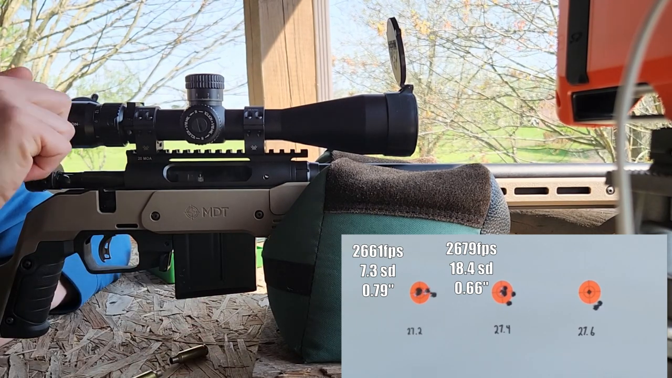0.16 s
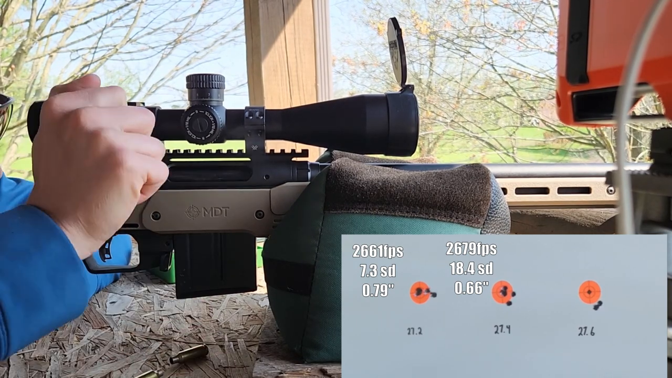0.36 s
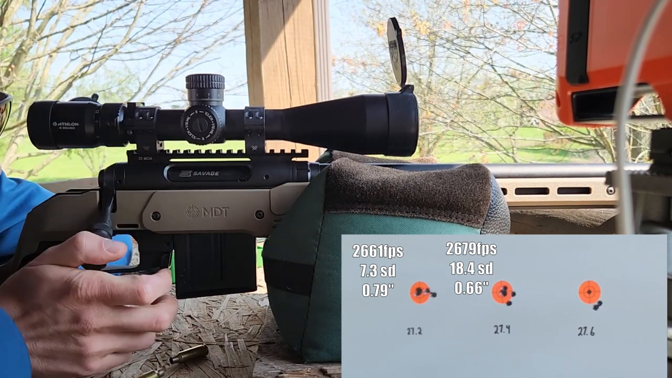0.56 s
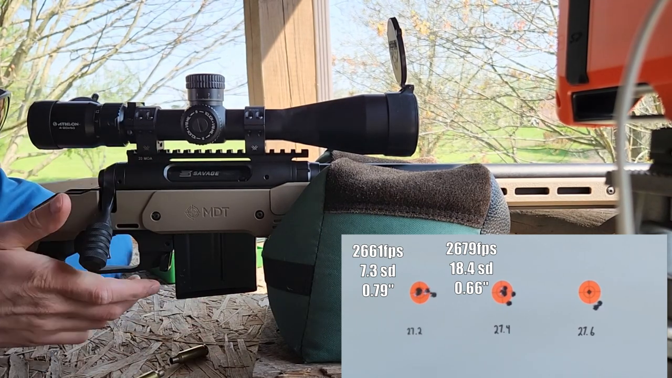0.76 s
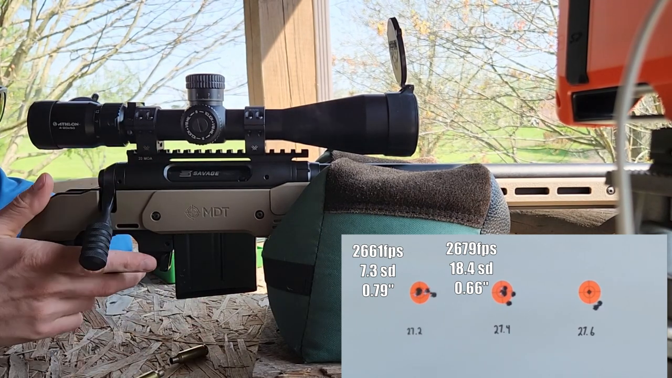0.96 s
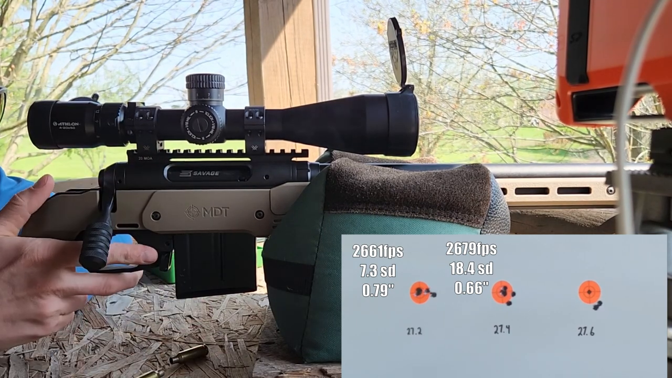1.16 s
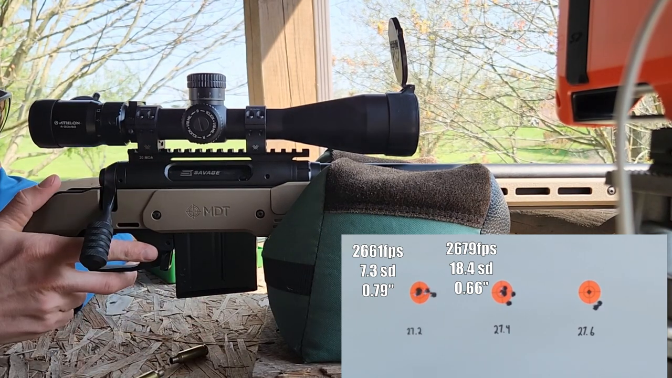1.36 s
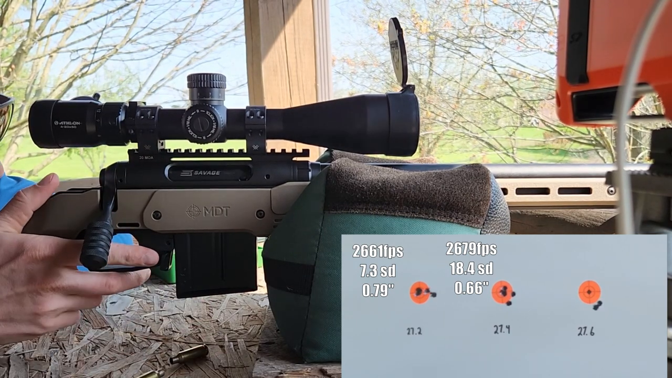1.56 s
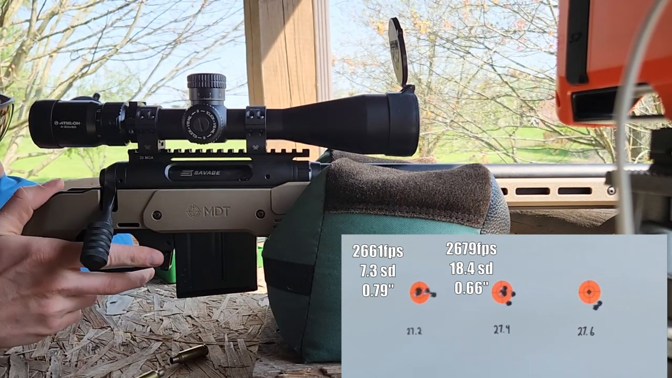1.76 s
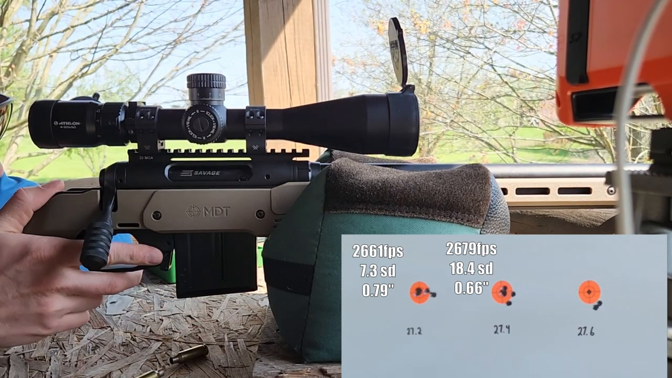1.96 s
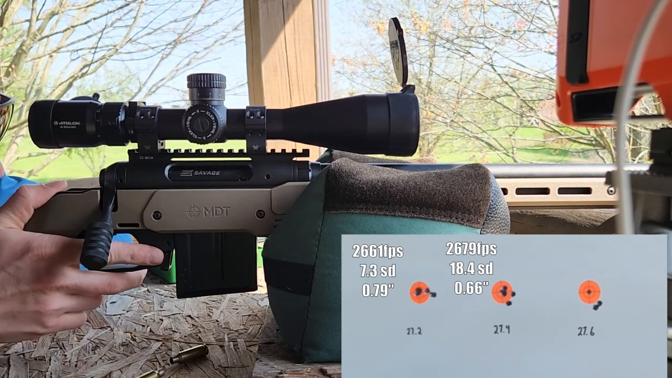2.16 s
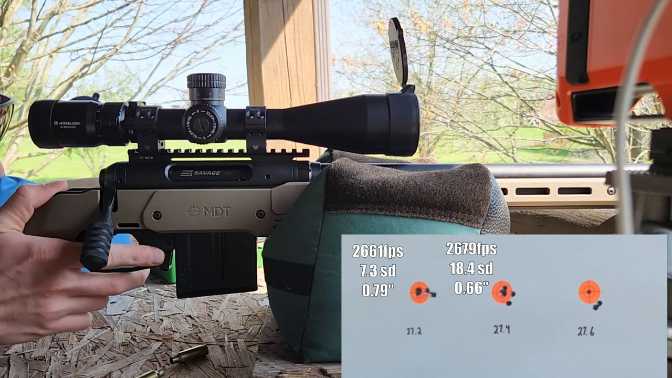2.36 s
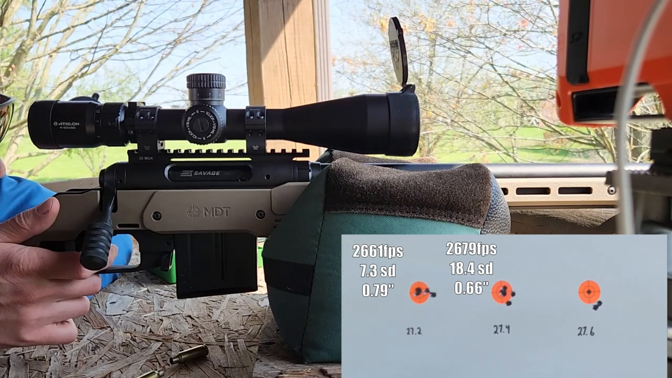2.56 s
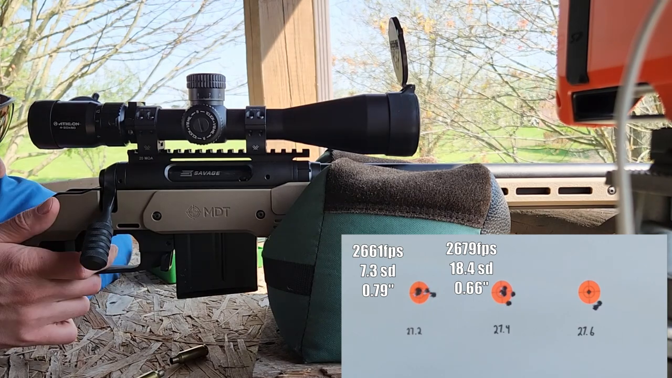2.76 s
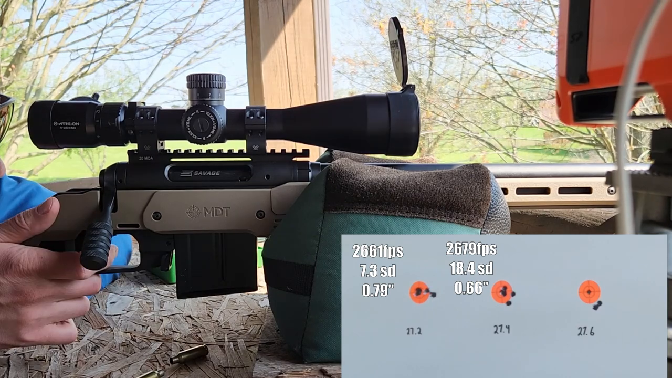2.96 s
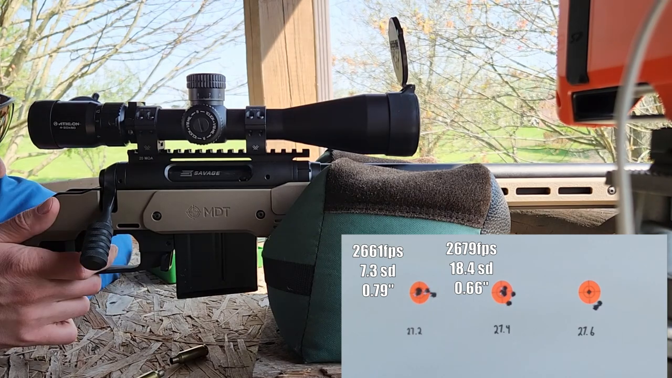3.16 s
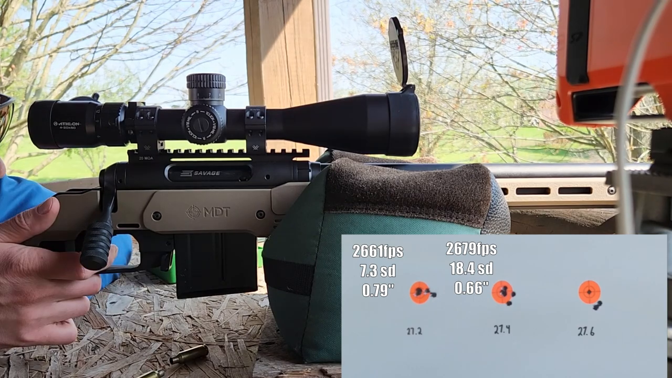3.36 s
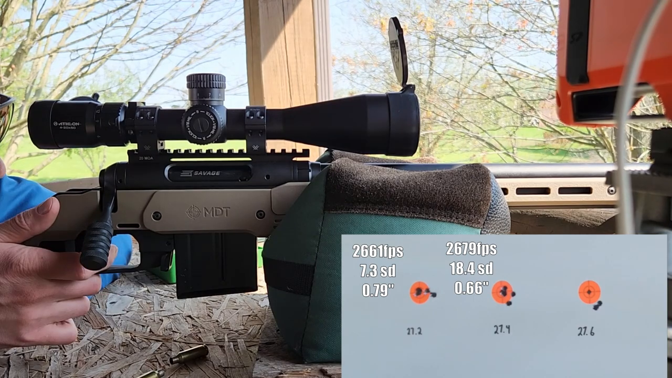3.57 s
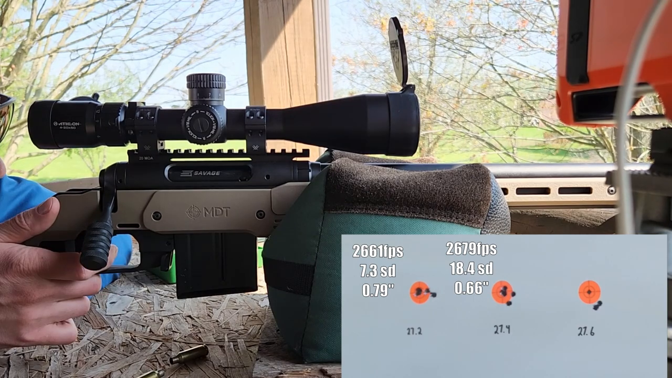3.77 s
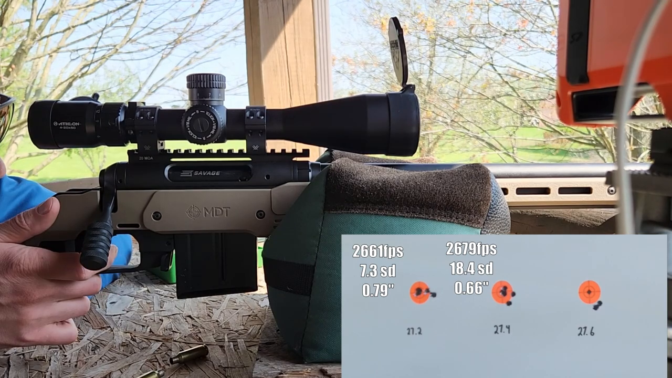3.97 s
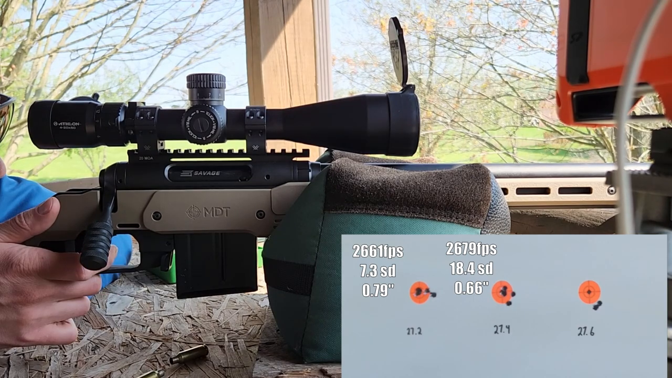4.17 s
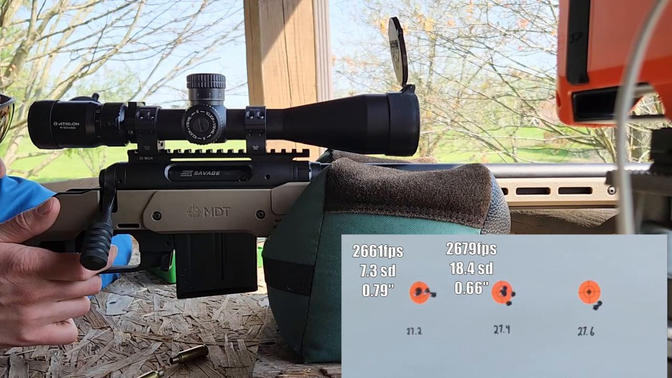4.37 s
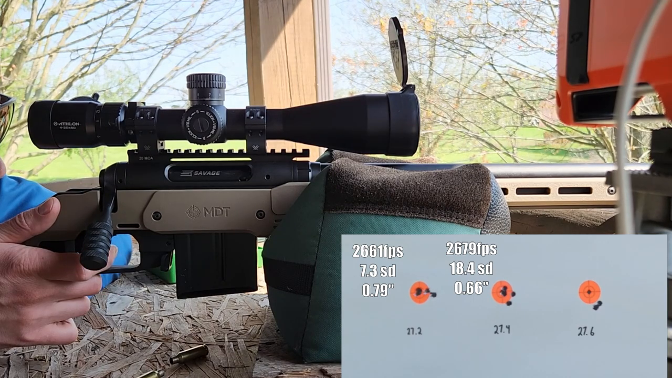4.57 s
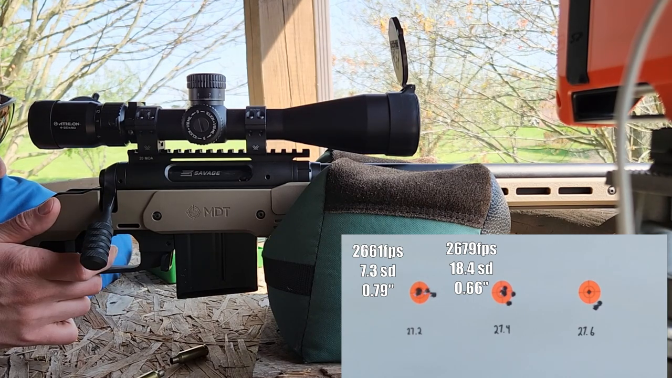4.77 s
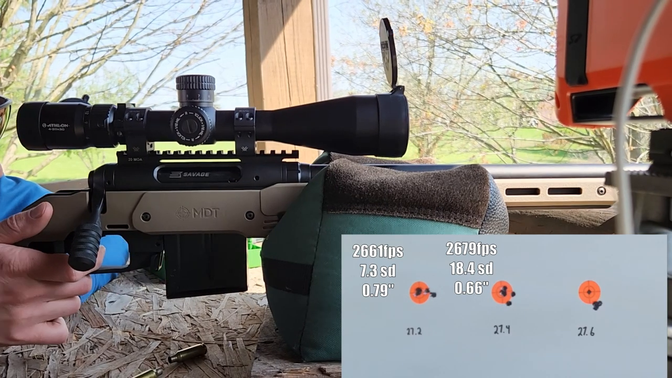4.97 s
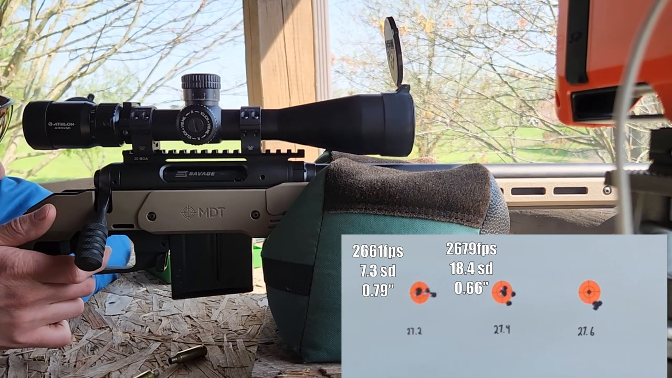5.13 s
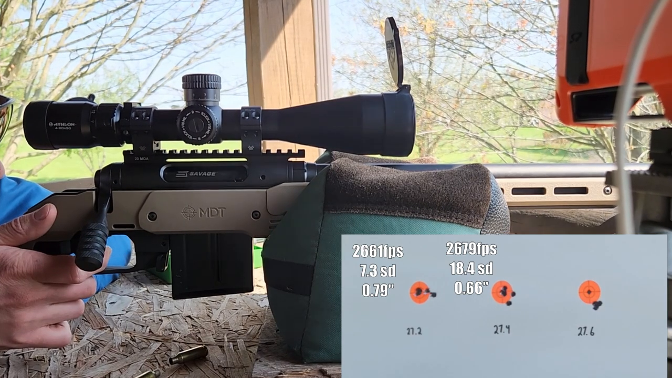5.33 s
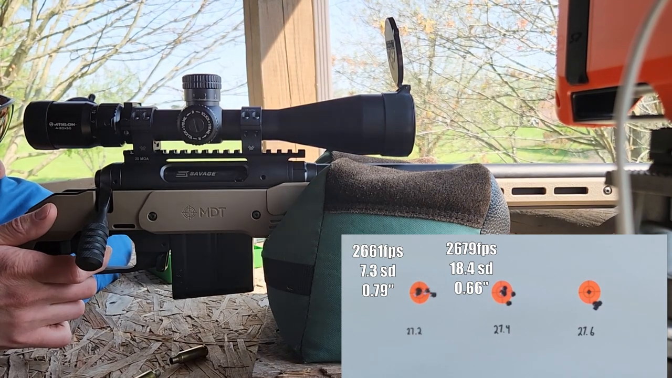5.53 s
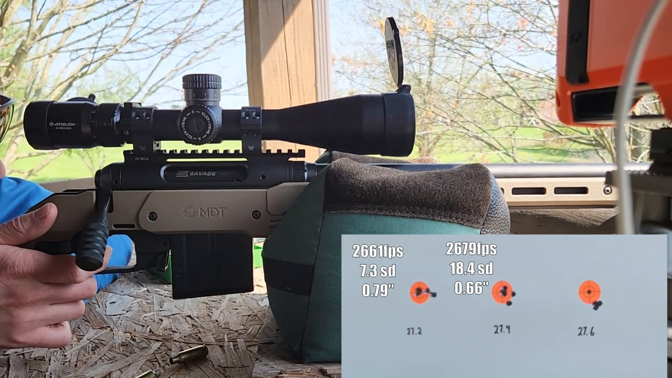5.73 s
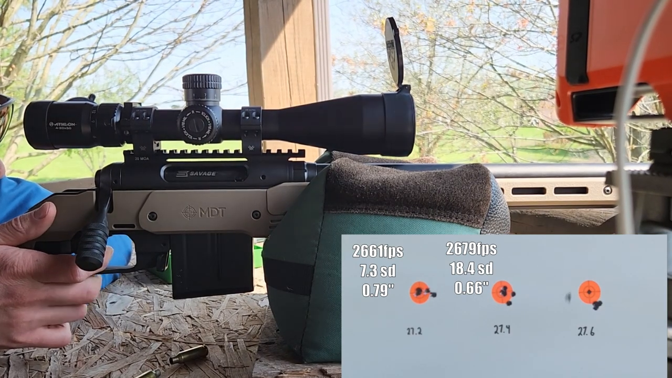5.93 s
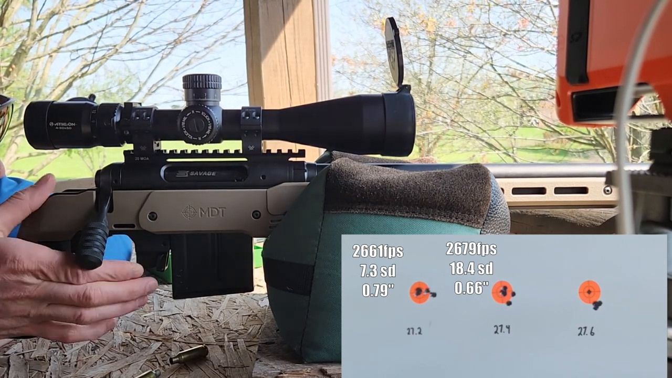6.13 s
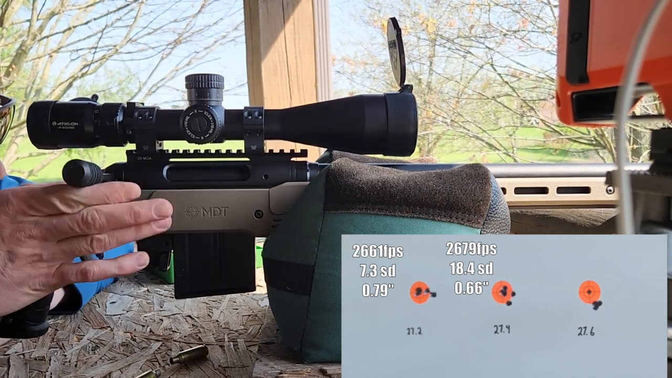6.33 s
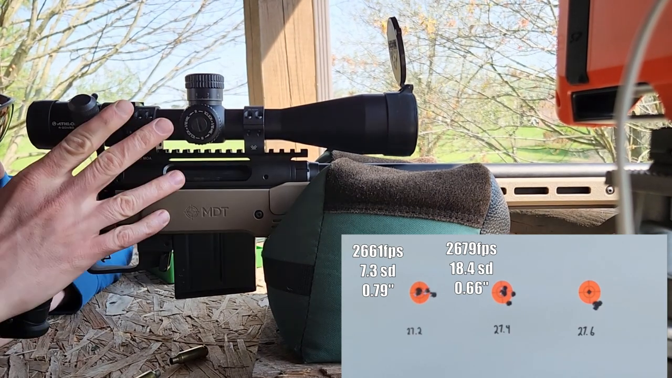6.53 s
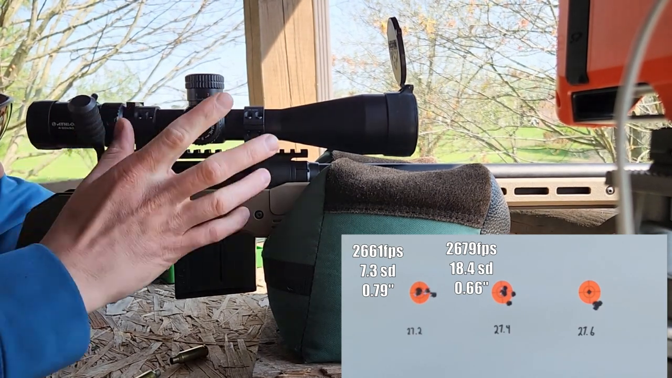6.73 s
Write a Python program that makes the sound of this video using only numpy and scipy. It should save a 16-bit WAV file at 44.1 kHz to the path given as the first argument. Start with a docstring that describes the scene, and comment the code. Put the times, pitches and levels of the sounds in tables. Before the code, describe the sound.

Very close to the microphone, a rifle bolt is pushed forward and locked with hard, bright steel clacks and a gritty slide. A quiet wait follows, with faint distant bird chirps, low rumble and slight hiss. Near five seconds one deafening shot bursts out, flattening the microphone, with quick hard echoes and a roll fading into the woods. The bolt then clicks open more softly.

```python
"""Bolt-action rifle at a range

A bolt-action rifle on a bench under a wooden shelter in the country. The bolt runs forward and locks: impact
noise excites the modes of the action. After a quiet wait with far birds (gliding sines) and low rumble
(coloured noise), one overloading shot, enveloped noise with a slow pressure swing, rolls away as echoes and
scattering among the trees. Then the bolt is lifted and starts back."""
import sys
import numpy as np
from scipy import signal
from scipy.fft import rfft, irfft, next_fast_len
from scipy.io import wavfile

SR = 44100
rng = np.random.default_rng(int(sys.argv[2]) if len(sys.argv) > 2 else 0)


def transcribe(u):
    """Save the signal u as a 16-bit wav file named by the first command-line argument.

    u: samples, shape (n,) or (channels, n), limited to [-1, 1]; the rate is SR.
    q: integer samples, one column per channel.
    """
    v = np.clip(np.atleast_2d(u).T, -1, 1)
    q = np.round(v * 32767).astype(np.int16)
    wavfile.write(sys.argv[1], SR, q)


N = 304290
TIME = np.arange(N) / SR
CUTOFF_HZ = 16000
LEFT_RIGHT = np.array([[1], [-1]])   # opposite signs for the two channels
SHOT_S = 4.9682

# Spectrum of the bright crack: (frequency [Hz], level [dB])
CRACK_SPECTRUM = [(100, -11.5), (500, 0.5), (1500, -1), (4500, -3.5), (8000, -5.5), (11000, -9.5),
                  (15500, -3)]
# Spectrum of the roar between bench and roof: (frequency [Hz], level [dB])
ROAR_SPECTRUM = [(60, -15), (140, -5), (300, -3), (480, 2.5), (720, 1), (1100, -2), (2000, -6),
                 (4000, -10.5), (8000, -17.5), (15500, -32.5)]
# Pressure swing of the muzzle gas: (crest [s], period [s], half length [s], height before the stereo gain)
GAS_SWING = (4.9838, 0.02, .011, 0.39)
LEAD_IN_S, LEAD_IN_DB = 0.012, -31.5   # a faint bright hiss swells just before the shot
MUZZLE_DB, MUZZLE_T60_S = -11.5, 0.085   # first crack, straight from the muzzle
# bright reflections of the crack under the roof
CRACK_DB, CRACK_ATTACK_S, CRACK_HOLD_S, CRACK_T60_S = -11, 0.026, 0.042, 0.11
ROAR_DB, ROAR_ATTACK_S, ROAR_HOLD_S, ROAR_T60_S = -6, 0.024, 0.044, 0.25
ROAR_LUMPS_DB = 1.24   # reflections arrive in clumps


def shot():
    """Impulsive radiation: a faint hiss, a crack, the swing of the muzzle gas and a roar of crowded reflections."""
    lead_in = from_db(LEAD_IN_DB) * swell(SHOT_S - LEAD_IN_S, 0.0065, LEAD_IN_S, 0.03)
    muzzle = from_db(MUZZLE_DB) * swell(SHOT_S, 0.0005, 0.0014, MUZZLE_T60_S)
    reflected = from_db(CRACK_DB) * swell(SHOT_S, CRACK_ATTACK_S, CRACK_HOLD_S, CRACK_T60_S)
    crack = together([muzzle, reflected])
    roar = from_db(ROAR_DB) * swell(SHOT_S, ROAR_ATTACK_S, ROAR_HOLD_S, ROAR_T60_S)
    roar_sound = roar * noise(ROAR_SPECTRUM) * from_db(ROAR_LUMPS_DB * drift(250))

    crest_s, period, half_length, height = GAS_SWING
    t = TIME - crest_s
    window = np.exp(-((t - 0.004) / half_length) ** 4 / 2)
    swing = height * np.cos(2 * np.pi * t / period) * window
    ports = from_db(1.7 * LEFT_RIGHT)   # the swing presses harder on the left port
    return lead_in * noise(STEEL_SPECTRUM) + crack * noise(CRACK_SPECTRUM) + roar_sound + swing * ports


# Hard echoes from the range: (arrival [s], peak before rounding [dB], length before rounding [s])
HARD_ECHOES = [(5.119, -4, 0.00181), (5.1229, -6.5, 0.00226)]


def hard_echoes(dull_hz=1500, ring_hz=215, ring_width=170):
    """Specular reflection: hard surfaces send back the N-shaped shock, rounded by distance."""
    out = np.zeros((2, N))
    for s, peak_db, length in HARD_ECHOES:
        add(out, s, from_db(peak_db) * np.linspace(1, -1, int(length * SR)))
    rounded = signal.sosfilt(signal.butter(1, dull_hz, fs=SR, output="sos"), out + 1e-18)
    return rounded + 0.53 * resonate(rounded, ring_hz, ring_width)


# Spectrum of the dull echoes: (frequency [Hz], level [dB])
ECHO_SPECTRUM = [(40, -13.5), (110, -1.5), (200, -3), (400, 1), (650, -4), (1000, -15.5), (2000, -19.5),
                 (5000, -50.5)]
# Spectrum scattered by the branches, before loss in the air: (frequency [Hz], level [dB])
SCATTER_SPECTRUM = [(200, -7.5), (600, -2.5), (1300, -3), (2200, -1), (4000, -4), (7000, -8), (10000, -15),
                    (15000, -24.5)]


def rolling_report(air_db=9.0, lumps_db=0.58):
    """Atmospheric absorption: the longer the path of an echo, the more treble the air takes.

    air_db is the loss per second and per kHz above 1.8 kHz."""
    echo, scatter = echo_levels()
    branches = rfft(noise(SCATTER_SPECTRUM))
    absorbed = 0
    hz = np.fft.rfftfreq(N, 1 / SR)
    centres = np.geomspace(500, CUTOFF_HZ, 9)
    travel = np.clip(TIME - HARD_ECHOES[0][0], 0, 1.4)   # s since the first hard echo
    for centre, own in zip(centres, np.eye(len(centres))):
        band = irfft(branches * np.interp(hz, centres, own), N)
        absorbed = absorbed + band * from_db(-air_db * travel * max(centre / 1000 - 1.8, 0))
    return (echo * noise(ECHO_SPECTRUM) + scatter * absorbed) * from_db(lumps_db * drift(110))


# Banks and tree lines return the report: (arrival [s], dull echo [dB], scatter from the branches [dB])
RETURNING_ECHOES = [(5.112, -22, -37), (5.155, -28.5, -43), (5.316, -27.5, -35), (5.721, -43, -46),
                    (6.5, -49, -67.5)]
SMEAR_RISE, SMEAR_HOLD, SMEAR_T60 = 0.11, 0.14, 0.97   # attack, hold and decay, as shares of the delay
BRANCHES_LEAD, BRANCHES_T60 = 0.18, 2.7   # branches answer earlier and for longer: shares of the delay
# the wood as a whole
TAIL_ATTACK_S, TAIL_T60_S, TAIL_ECHO_DB, TAIL_SCATTER_DB = 0.12, 3.94, -41.5, -39.5


def echo_levels():
    """Diffuse decay: a dying tail plus single returns, each smeared in proportion to its delay."""
    tail = swell(SHOT_S, TAIL_ATTACK_S, 0, TAIL_T60_S)
    echo = [from_db(TAIL_ECHO_DB) * tail]
    scatter = [from_db(TAIL_SCATTER_DB) * tail]
    for s, echo_db, scatter_db in RETURNING_ECHOES:
        delay = s - SHOT_S
        rise, hold = SMEAR_RISE * delay, SMEAR_HOLD * delay
        start = s - rise
        early = start - BRANCHES_LEAD * delay
        echo.append(from_db(echo_db) * swell(start, rise, hold, SMEAR_T60 * delay))
        scatter.append(from_db(scatter_db) * swell(early, rise, hold, BRANCHES_T60 * delay))
    return together(echo), together(scatter)


# Blows of bolt and cartridge, in order: a round is picked up, jumps from the magazine and runs into the
# chamber; the lugs engage and the handle locks; a touch while aiming; the handle lifts, the case breaks
# free and the bolt starts back. Steel and thud levels are relative:
# (time [s], steel level [dB], chatter decay [s], brightness [dB per octave], clack [Hz], stock thud [dB])
BOLT_CONTACTS = [ (.187, -51, 0.021, 0, 1200, -75), (0.2225, -22, 0.0047, 3.5, 780, -46),
                 (.234, -24.5, 0.014, -1.5, 726, -66), (.259, -21.5, .009, -1, 740, -60),
                 (.269, -8, 0.0028, -2, 3600, -53), (0.2726, -4, .0026, -2.5, 780, -53),
                 (.277, -10.5, .0033, 5, 1447, -43), (.300, -24, .008, .5, 3300, -53.5),
                 (0.3267, -19, 0.0033, 6, 4450, -60), (.335, -11, 0.0028, 4.5, 10010, -40),
                 (.472, -39.5, 0.0065, -1, 6000, -61), (.4815, -25.5, 0.0062, 1, 2930, -47.5),
                 (.614, -22, 0.0011, -1.5, 3600, -49), (.616, -17.5, .0022, -.5, 2300, -32),
                 (1.893, -61, .012, -2.5, 3390, -85), (6.291, -42.5, 0.003, 2, 3800, -75),
                 (6.321, -31.5, 0.0049, -2, 1910, -49), (6.464, -37, 0.0087, 2, 12000, -60),
                 (6.481, -31, 0.0081, 0.5, 10500, -45.5), (6.4912, -24.5, 0.0066, 3, 2380, -42.5),
                 (6.501, -30.5, .0031, -2, 900, -49), (6.877, -47, 0.013, -3, 1810, -57)]
# Broad spectrum of a steel contact: (frequency [Hz], level [dB])
STEEL_SPECTRUM = [(150, -33), (440, -30), (600, -4), (760, -1), (1400, -2.5), (2400, -4.5), (4000, -2),
                  (5600, -7.5), (7500, -7.5), (9500, -12), (15500, -18)]
# Modes of the action: (frequency [Hz], width [Hz], relative level [dB])
ACTION_MODES = [(746, 110, 5.5), (1060, 75, 4.5), (1310, 29, 1.5), (1517, 60, 2), (1863, 200, 4.5),
                (2794, 28, -1.5), (3127, 35, 1), (3492, 90, 2), (3860, 80, 5.5), (4300, 80, 1.5),
                (4890, 100, 0), (6400, 340, 1.5), (7300, 120, 4.5), (12200, 210, 3.5)]
# Thin steel parts that ring on after a blow: (frequency [Hz], relative level [dB], t60 [s])
THIN_PART_MODES = [(3117, -0.5, 0.18), (4199, -4.5, 0.25), (5868, -1, 0.17), (5986, -4, 0.17),
                   (6460, -3.5, 0.17), (7074, -1, 0.14)]
# Dull knock of the stock: (frequency [Hz], level [dB])
STOCK_SPECTRUM = [(40, -18), (110, 0.5), (200, -4.5), (330, 0.5), (520, -9.5), (1200, -37.5)]
# Stereo likeness of the rifle's own parts: (frequency [Hz], left-right correlation [-1 to 1])
NEAR_LIKENESS = [(100, 1), (900, .8), (2000, .45), (4000, 0.05), (8000, 0.12), (15000, 0.055)]
STEEL_LOW_HZ = 560   # the small steel parts radiate little below this


def bolt(size=4096, clack_db=5.0, clack_octaves=0.58, thin_db=-4):
    """Modal excitation: each contact chatters around its own pitch, rings the action and knocks the stock."""
    steel, stock = np.zeros((2, 2, N))
    grid = np.geomspace(100, CUTOFF_HZ, 80)
    for s, level_db, decay, tilt_db, clack_hz, thud_db in BOLT_CONTACTS:
        # light parts and hard contacts speak high, the heavy bolt low
        hump = clack_db * np.exp(-(np.log2(grid / clack_hz) / clack_octaves) ** 2)
        colour = np.column_stack([grid, at_hz(STEEL_SPECTRUM, grid) + hump])
        clack = noise(colour, size, NEAR_LIKENESS, tilt_db) * chatter(size)
        thud = noise(STOCK_SPECTRUM, size, NEAR_LIKENESS)
        add(steel, s, from_db(level_db) * burst(clack, decay))
        add(stock, s, from_db(thud_db) * burst(thud, decay=0.017))
    steel = signal.sosfilt(signal.butter(4, STEEL_LOW_HZ, "high", fs=SR, output="sos"), steel + 1e-18)
    rings = sum(from_db(db) * resonate(steel, hz, width) for hz, width, db in ACTION_MODES)
    thin = 0
    for hz, db, t60 in THIN_PART_MODES:
        width = np.log(1000) / (np.pi * t60)   # bandwidth that gives this decay time
        thin = thin + from_db(db + thin_db) * resonate(steel, hz, width)
    return from_db(-1) * steel + from_db(-5.5) * rings + thin + stock


def chatter(size, rough_db=2.0, rate=1500):
    """Repeated impact: steel rebounds on steel in many uneven micro-impacts."""
    return from_db(rough_db * drift(rate)[:size])


# Strokes of hand, sleeve and bolt along the rifle:
# (start [s], hold [s], rubbing level [dB], gritty slide level [dB])
HAND_STROKES = [(-.02, 0.11, -54, -70), (0.228, 0.051, -58.5, -39), (.42, 0.12, -62, -55),
                (.725, .02, -62.5, -70), (6.244, 0.26, -51, -84)]
# Spectrum of rubbing: (frequency [Hz], level [dB])
RUB_SPECTRUM = [(60, -3.5), (300, -2), (650, -2), (1100, -13), (2200, -21), (4200, -29.5), (8000, -41)]
# Spectrum of the gritty slide: (frequency [Hz], level [dB])
GRIT_SPECTRUM = [(400, -17.5), (900, 0.5), (3500, 6), (6000, -1), (9000, -3.5), (13000, -2), (16000, -3)]
# The hand bumps the stock: (time [s], level before the low-pass [dB])
HAND_BUMPS = [(0.622, -38), (1.73, -55), (2.475, -53.5), (2.765, -49.5), (4.401, -57), (4.78, -46),
              (6.351, -47.5), (6.386, -52), (6.765, -52.5)]
# Light taps of the hand reaching for the bolt: (time [s], level [dB])
HAND_TAPS = [(.026, -42.5), (.067, -46), (0.095, -48.5)]
# Spectrum of a tap: (frequency [Hz], level [dB])
TAP_SPECTRUM = [(150, -9), (500, -1), (780, -3), (1400, -15.5), (4000, -35), (10000, -42)]
STROKE_ATTACK_S, STROKE_T60_S = 0.018, 0.27


def hand(size=8192, soft_hz=220):
    """Friction and soft impact: cloth and skin rub, tap and bump dully; sliding surfaces catch in fine grains."""
    rubs, grits = [], []
    for s, hold, rub_db, grit_db in HAND_STROKES:
        shape = swell(s, STROKE_ATTACK_S, hold, STROKE_T60_S)
        rubs.append(shape * from_db(rub_db))
        grits.append(shape * from_db(grit_db))
    rub = together(rubs) * noise(RUB_SPECTRUM) * from_db(2.3 * drift(41))
    grit = together(grits) * rms_one(noise(GRIT_SPECTRUM) * from_db(4.5 * drift(400)))

    bumps, taps = np.zeros((2, 2, N))
    for s, level_db in HAND_BUMPS:
        grain = noise(STOCK_SPECTRUM, size, NEAR_LIKENESS)
        add(bumps, s, from_db(level_db) * burst(grain, decay=0.025, rise=0.0023))
    for s, level_db in HAND_TAPS:
        grain = noise(TAP_SPECTRUM, size, NEAR_LIKENESS)
        add(taps, s, from_db(level_db) * burst(grain, decay=0.0033, rise=0.0014))
    bumps = signal.sosfilt(signal.butter(2, soft_hz, fs=SR, output="sos"), bumps + 1e-18)
    return bumps + taps + rub + grit


# Faint rustles of the sleeve: (start [s], hold [s], level [dB])
SLEEVE_RUSTLES = [(0.063, 0.11, -67), (0.157, 0.028, -59), (1.28, .03, -77), (2.69, .02, -80),
                  (3.0, .03, -78), (3.82, .05, -79), (4.42, .12, -79), (4.6, .1, -72.5), (4.81, .06, -74.5)]
# Spectrum of a rustle: (frequency [Hz], level [dB])
RUSTLE_SPECTRUM = [(800, -10), (2400, -5), (3400, 0), (4100, -2), (5200, -13), (10000, -22)]
RUSTLE_ATTACK_S, RUSTLE_T60_S = 0.03, 0.3


def sleeve(grain_db=3.0):
    """Friction noise: nylon brushes past in short, finely grained whispers."""
    level = together(from_db(db) * swell(s, RUSTLE_ATTACK_S, hold, RUSTLE_T60_S)
                     for s, hold, db in SLEEVE_RUSTLES)
    return level * rms_one(noise(RUSTLE_SPECTRUM) * from_db(grain_db * drift(200)))


# The rest bag shifts after the recoil: (start [s], level [dB])
BAG_SHIFTS = [(5.54, -69), (5.665, -53.5), (5.91, -67.5)]
# Fine crackle of the filling: (frequency [Hz], level [dB])
FILLING_SPECTRUM = [(2000, -17), (5000, -3), (9000, -9), (11000, -1.5), (13000, 0.5), (15500, -2)]
SHIFT_ATTACK_S, SHIFT_HOLD_S, SHIFT_T60_S = 0.033, 0.016, 0.31


def rest_bag():
    """Granular noise: the filling shifts in clumps of tiny grains."""
    level = together(from_db(db) * swell(s, SHIFT_ATTACK_S, SHIFT_HOLD_S, SHIFT_T60_S) for s, db in BAG_SHIFTS)
    return level * rms_one(noise(FILLING_SPECTRUM) * from_db(3.6 * drift(590)))


# A warbled phrase, relative level: (start [s], start pitch [Hz], end pitch [Hz], level [dB])
WARBLE_NOTES = [(.815, 2620, 2740, -71), (.923, 2430, 2280, -68), (.96, 2300, 2690, -69),
                (1.05, 2290, 2420, -73), (1.12, 2450, 2530, -82), (1.215, 2390, 2280, -78)]
# Chirps, relative level: (start [s], start pitch [Hz], end pitch [Hz], level [dB])
CHIRP_NOTES = [(1.459, 3100, 4100, -77.5), (1.792, 4000, 3870, -76), (3.012, 4050, 3850, -75.5),
               (3.724, 3100, 2490, -78), (3.789, 4090, 3900, -77)]
# Thin falling chips, relative level: (start [s], level [dB])
CHIP_NOTES = [(1.72, -72), (1.928, -74), (2.27, -75), (3.329, -75), (3.574, -77)]
# Soft level whistles, relative level: (start [s], pitch [Hz], level [dB])
WHISTLE_NOTES = [(1.9, 2000, -79), (2.07, 2010, -79), (4.04, 1830, -78.5)]
WARBLE_NOTE_S, CHIRP_LENGTH_S, WHISTLE_LENGTH_S = 0.0645, 0.056, 0.18
CHIP_LENGTH_S, CHIP_START_HZ, CHIP_END_HZ = 0.045, 7300, 6650


def birds(waver=0.021, flutter_db=1.5):
    """Frequency modulation: short gliding whistles with a quick flutter, blurred by the wood."""
    out = np.zeros((2, N))
    wobble = 1 + waver * drift(300)
    notes = [(s, WARBLE_NOTE_S, start_hz, end_hz, db) for s, start_hz, end_hz, db in WARBLE_NOTES]
    notes += [(s, CHIRP_LENGTH_S, start_hz, end_hz, db) for s, start_hz, end_hz, db in CHIRP_NOTES]
    notes += [(s, CHIP_LENGTH_S, CHIP_START_HZ, CHIP_END_HZ, db) for s, db in CHIP_NOTES]
    notes += [(s, WHISTLE_LENGTH_S, hz, hz, db) for s, hz, db in WHISTLE_NOTES]
    for s, length, start_hz, end_hz, level_db in notes:
        n = int(length * SR)
        hz = np.linspace(start_hz, end_hz, n) * wobble[int(s * SR):][:n]
        phase = 2 * np.pi * np.cumsum(hz) / SR
        add(out, s, from_db(level_db) * np.hanning(n) * np.sin(phase))
    return reverberate(out * from_db(flutter_db * drift(150)), t60=0.34, wet_db=-5.5) * from_db(-1.0)


# Swells of low noise: the outdoor rumble, and low surges under the bolt's thud near 0.27 s and the hand's bumps
# near 6.3 s: (start [s], hold [s], level before the stereo gain [dB])
RUMBLE_SWELLS = [(0.266, 0.09, -44), (2.43, 1.59, -52), (2.73, .35, -48), (3.37, .08, -52),
                 (4.345, 0.044, -43.5), (4.72, .06, -42), (6.302, 0.22, -48)]
# Spectrum of the rumble: (frequency [Hz], level [dB])
RUMBLE_SPECTRUM = [(20, -9), (35, -4), (58, 2.5), (90, -3), (125, -5), (170, -16.5), (270, -23.5),
                   (400, -36.5), (900, -59.5)]
# Air in the far trees: (time [s], level [dB])
BREEZE_LEVEL = [(0, -80), (1.7, -79), (2.3, -72.5), (2.9, -73.5), (4.8, -70.5), (6.9, -73.5)]
# Spectrum of the breeze: (frequency [Hz], level [dB])
BREEZE_SPECTRUM = [(100, -0.5), (450, 0), (800, -0.5), (1300, -11.5), (2600, -14), (5000, -24),
                   (10000, -33.5)]
# Spectrum of the microphone's own hiss: (frequency [Hz], level [dB])
HISS_SPECTRUM = [(500, -2.5), (2500, -0.5), (5000, -5.5), (9500, -9), (11000, -5), (12500, 0.5), (14500, 1),
                 (15200, 6), (16000, 0.5)]
RUMBLE_DB, RUMBLE_ATTACK_S, RUMBLE_T60_S = -54, 0.05, 1


def outdoors(left_db=1.27, lumps_db=2.34):
    """Random noise: lumpy low rumble, a little to the left; air in the trees; the microphone's own hiss."""
    swells = [from_db(db) * swell(s, RUMBLE_ATTACK_S, hold, RUMBLE_T60_S) for s, hold, db in RUMBLE_SWELLS]
    rumble = together([from_db(RUMBLE_DB)] + swells)
    breeze = from_db(np.interp(TIME, *np.transpose(BREEZE_LEVEL)))
    lumps = from_db(lumps_db * drift(15) + left_db * LEFT_RIGHT)
    hiss = from_db(-73.5) * noise(HISS_SPECTRUM)
    return rumble * lumps * noise(RUMBLE_SPECTRUM) + breeze * noise(BREEZE_SPECTRUM) + hiss


# Spectrum of the reflected wash: (frequency [Hz], level [dB])
WASH_SPECTRUM = [(100, -4), (350, -3), (700, -3.5), (1200, 0), (4000, -0.5), (9000, -1), (15000, 3)]


def reverberate(x, t60, wet_db, first_s=0.011, size=22050, dull_hz=4500, treble_t60=0.6):
    """Reverberation: many reflections form a short, dense wash whose treble dies first."""
    t = TIME[:size]
    wash = noise(WASH_SPECTRUM, size) * from_db(-60 * t / t60) * (1 - np.exp(-(t / first_s) ** 2))
    dull = signal.sosfilt(signal.butter(1, dull_hz, fs=SR, output="sos"), wash)
    wash = dull + (wash - dull) * from_db(-60 * t / treble_t60)   # extra decay of the treble
    wash = wash / np.sqrt(np.sum(wash ** 2) / 2)   # mean energy 1 per channel
    return x + from_db(wet_db) * signal.fftconvolve(x, wash, axes=1)[:, :N]


# Stereo likeness of wide sounds: (frequency [Hz], left-right correlation [-1 to 1])
WIDE_LIKENESS = [(30, 0.93), (120, 0.79), (300, 0.65), (700, 0.5), (1400, .14), (3000, 0), (15000, 0.058)]


def noise(colour, size=N, likeness=WIDE_LIKENESS, tilt_db=0):
    """Spectral shaping: stereo noise of a given colour, tilted per octave above 700 Hz; overall rms 1."""
    length = next_fast_len(size)
    hz = np.fft.rfftfreq(length, 1 / SR) + 1
    mid, side = rfft(rng.standard_normal((2, length)))
    alike = np.clip(at_hz(likeness, hz), -1, 1)
    pair = np.sqrt(1 + alike) * mid + np.sqrt(1 - alike) * side * LEFT_RIGHT
    octaves = np.log2(np.maximum(hz, 700) / 700)
    audible = (hz > 18) & (hz < CUTOFF_HZ)
    gain = audible * from_db(at_hz(colour, hz) + tilt_db * octaves)
    return rms_one(irfft(pair * gain, length)[:, :size])


def drift(rate):
    """Random modulation: straight lines between chance values of spread 1, rate of them per second."""
    knots = rng.standard_normal(4096)
    return np.interp(TIME * rate, np.arange(len(knots)), knots)


def resonate(x, hz, width):
    """Resonance: one two-pole mode, gain about 1 at its peak."""
    r = np.exp(-np.pi * width / SR)
    zeros = np.array([1, 0, -1]) * (1 - r * r) / 2
    poles = [1, -2 * r * np.cos(2 * np.pi * hz / SR), r * r]
    return signal.lfilter(zeros, poles, x + 1e-18)


def burst(grain, decay, rise=0.0005):
    """Impact: a blow swells at once and dies away; its energy depends on its envelope alone."""
    t = TIME[:grain.shape[-1]]
    shape = (1 - np.exp(-t / rise)) * np.exp(-t / decay)
    return rms_one(grain * shape) * np.sqrt(np.mean(shape ** 2)) / shape.max()


def swell(s, attack_s, hold_s, t60):
    """Exponential decay: an envelope of attack, hold and release, top 1."""
    t = TIME - s
    release = np.clip((t - attack_s - hold_s) / t60, 0, 4)
    return np.clip(t / attack_s, 0, 1) ** 2 * from_db(-60 * release)


def together(envelopes):
    """Incoherent summation: unrelated sounds add up in power."""
    return np.sqrt(sum(e ** 2 for e in envelopes))


def add(out, s, sound):
    """Superposition: mix a sound in at a given time."""
    i = int(s * SR)
    out[:, i:i + sound.shape[-1]] += sound[..., :N - i]


def from_db(db):
    """Level: decibels to amplitude gain."""
    return 10 ** (np.asarray(db) / 20)


def rms_one(x):
    """Normalization: scale to unit rms."""
    return x / np.sqrt(np.mean(x ** 2) + 1e-20)


def at_hz(points, hz):
    """Logarithmic frequency scale: read a table along it."""
    f, value = np.transpose(points)
    return np.interp(np.log(hz), np.log(f), value)


def scene():
    """Superposition: the rifle close by, its report and the countryside."""
    report = (shot() + hard_echoes() + rolling_report()) * from_db(0.33 * LEFT_RIGHT)
    action = reverberate(bolt(), t60=0.25, wet_db=-13.5)   # bench, posts and roof reflect the bolt
    return report + action + hand() + sleeve() + rest_bag() + birds() + outdoors()


def record(dry):
    """Saturation and band limiting: the loudest peaks are flattened and the top is cut."""
    squashed = dry / (1 + np.abs(dry / 0.95) ** 4) ** (1 / 4)
    return signal.sosfilt(signal.ellip(10, 0.1, 70, CUTOFF_HZ, fs=SR, output="sos"), squashed)


dry = scene()
out = record(dry)
transcribe(out)
```